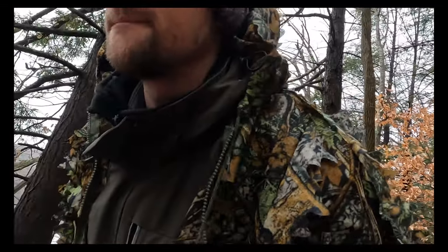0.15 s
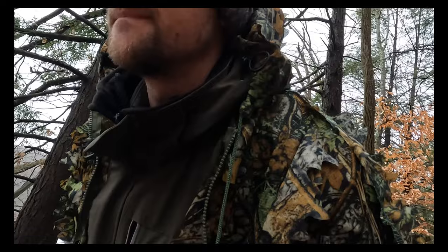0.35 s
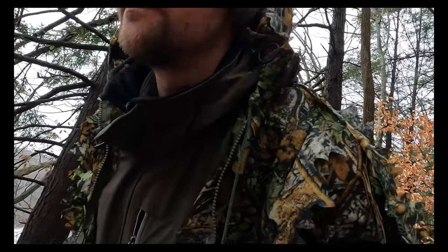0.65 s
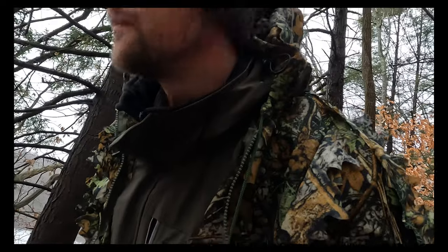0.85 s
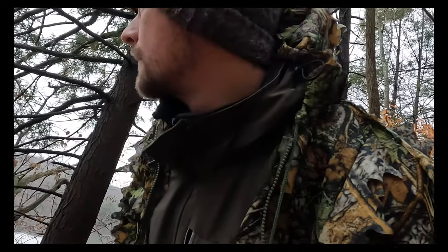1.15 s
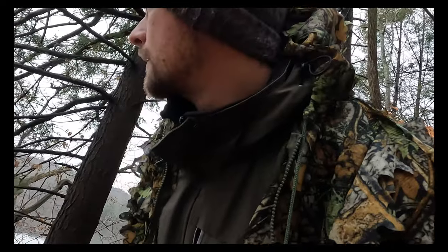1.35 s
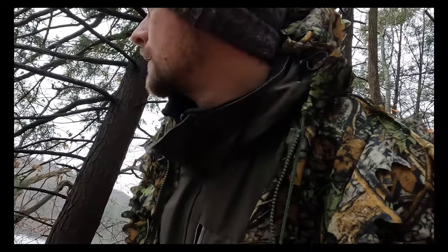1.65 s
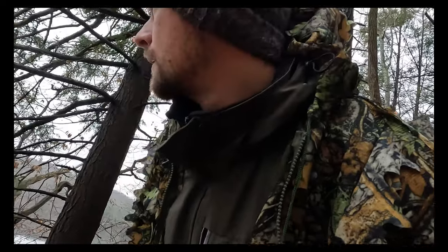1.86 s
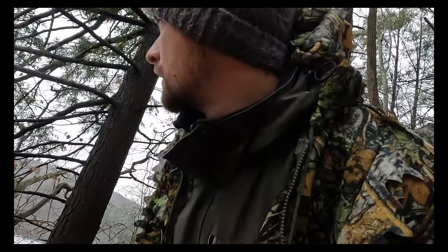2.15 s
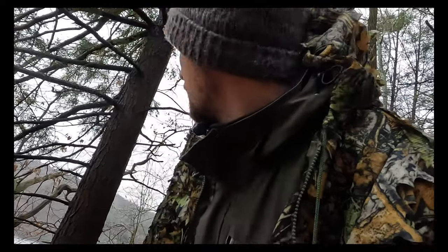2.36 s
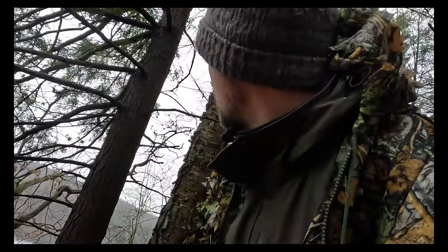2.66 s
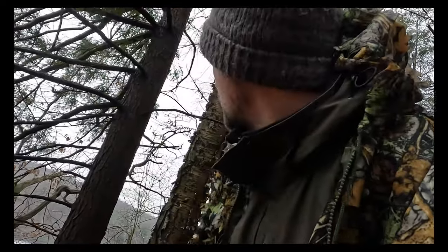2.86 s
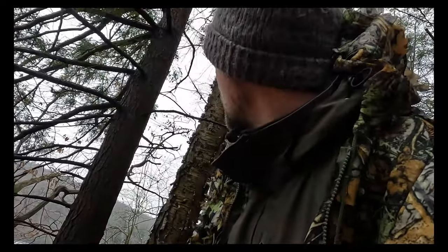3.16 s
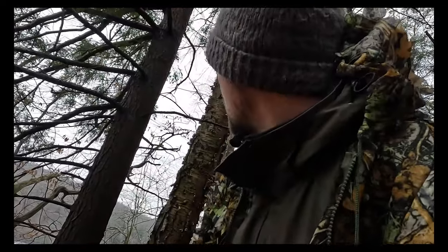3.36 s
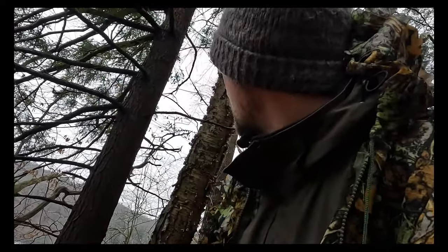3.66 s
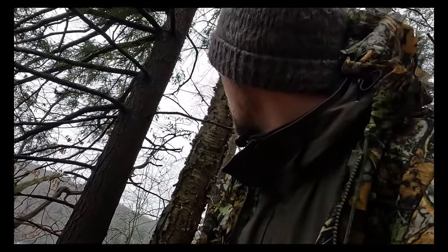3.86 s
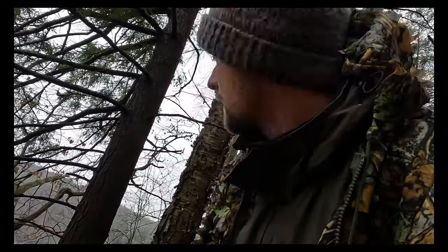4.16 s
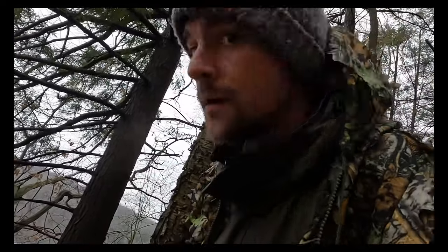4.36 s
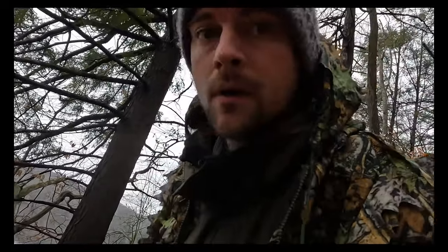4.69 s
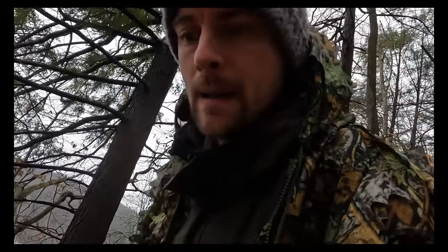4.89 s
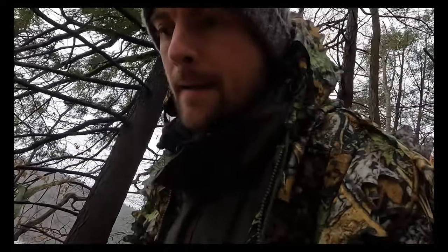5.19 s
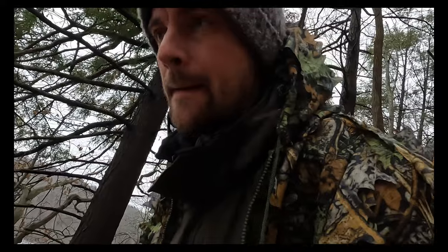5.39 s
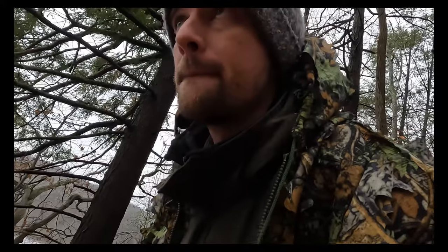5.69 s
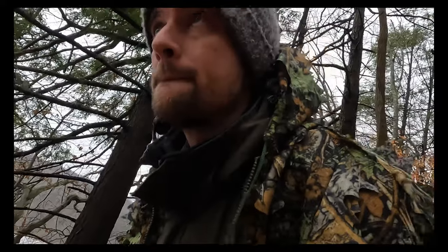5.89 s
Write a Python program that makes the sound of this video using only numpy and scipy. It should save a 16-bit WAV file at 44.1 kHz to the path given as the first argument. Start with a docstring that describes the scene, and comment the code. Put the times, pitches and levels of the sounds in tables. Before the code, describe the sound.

Close cloth noise opens the scene: soft hiss, tiny snaps and dry ticks, mostly towards the left, above a quiet deep rumble. Two faint sliding tones lead into a mid-distance bird, whose short nasal notes repeat in regular pairs until the end, echoing diffusely through the forest. The jacket settles, stirs again midway with soft rubs, and finally gives a hard snap. The microphone sits beside the clothing, in open wooded air.

```python
"""From the start a low rumble of far traffic or water lies under a jacket that rustles close by: noise and tiny snaps.
A thin hiss flickers at the very top, and soon the cloth ticks: sharp snaps that strike short ringing tones.
Then come two soft sliding tones, and a large woodland bird calls some way off, mostly in quick pairs.
Its arched, nasal notes are stacks of sine waves; random echoes off bare trunks stretch them into a long haze.
Later the cloth also gives short rubs, which are grainy puffs of noise."""
import sys
import numpy as np
from scipy import signal
from scipy.fft import rfft, irfft
from scipy.io import wavfile

SR = 44100
rng = np.random.default_rng(int(sys.argv[2]) if len(sys.argv) > 2 else 0)


def persist_wave(psi):
    """Save psi, clipped to +-1, as 16-bit WAV."""
    counts = np.round(np.clip(psi, -1, 1) * 32767).astype(np.int16)
    wavfile.write(sys.argv[1], SR, np.atleast_2d(counts).T)


N = 266055   # samples, about 6 s


def from_db(db):
    """Turn decibels into a gain."""
    return 10 ** (np.asarray(db) / 20)


def rms_one(x):
    """Scale a sound to an average (rms) level of 1."""
    return x / np.sqrt(np.mean(x ** 2) + 1e-20)


def in_time(rows):
    """Read each column of a table at every sample, in straight lines between its rows."""
    s, *columns = np.transpose(rows)
    return [np.interp(np.arange(N) / SR, s, column) for column in columns]


def at_hz(points, hz):
    """Read a spectrum table at any frequency, on a logarithmic axis."""
    table_hz, db = np.transpose(points)
    return np.interp(np.log(hz), np.log(table_hz), db)


def filtered(x, order, hz, kind="low"):
    """Filter a sound; hz is one cutoff, or the two edges of a band."""
    return signal.sosfilt(signal.butter(order, hz, kind, fs=SR, output="sos"), x)


def pan(x, db):
    """Make mono into stereo, with the left louder than the right by db."""
    return np.array([x * from_db(db / 2), x * from_db(-db / 2)])


def add(track, s, sound):
    """Mix a sound into a track, starting at s seconds."""
    i = round(s * SR)
    track[..., i:i + sound.shape[-1]] += sound[..., :N - i]


def drift(rate):
    """Slow random wandering of spread 1; a higher rate (Hz) wanders faster."""
    step = 40   # samples between computed points
    r = np.exp(-2 * np.pi * step * rate / SR)
    noise = rng.standard_normal(N // step + 2002)
    slow = signal.lfilter([1], [1, -2 * r, r * r], noise)[2000:]   # skip the filter's start
    return np.interp(np.arange(N) / step, np.arange(len(slow)), rms_one(slow))


# how alike left and right are in the rumble and rustle: f/Hz, likeness (1 = the same)
LEFT_RIGHT_LIKENESS = [(60, .992), (150, .985), (280, .6), (600, .74), (2800, .78), (6000, .55),
                       (12900, .3)]
# how far those two lean to one side: f/Hz, left minus right level/dB
LEFT_RIGHT_BALANCE = [(130, .2), (260, -2.8), (600, 0), (2800, 1), (6000, 2), (12900, 5)]


def coloured(spectrum, source):
    """Shape two noises by a spectrum, as the middle and sides of a stereo sound of rms 1."""
    hz = np.maximum(np.fft.rfftfreq(N, 1 / SR), 1)
    mid, side = rfft(source) * from_db(at_hz(spectrum, hz))
    alike = np.clip(at_hz(LEFT_RIGHT_LIKENESS, hz), -1, 1)
    lean = from_db(at_hz(LEFT_RIGHT_BALANCE, hz) / 2)
    mid = np.sqrt(1 + alike) * mid
    side = np.sqrt(1 - alike) * side
    return rms_one(irfft(np.array([(mid + side) * lean, (mid - side) / lean]), N))


# tone colour of the rumble, only relative: f/Hz, level/dB per Hz
RUMBLE_COLOUR = [(15, -27.5), (25, 1.5), (40, -1), (60, -2.5), (124, -11), (200, -21), (311, -31.5),
                 (420, -46), (600, -45), (800, -50.5), (1300, -41), (2500, -51), (7000, -72), (9000, -73),
                 (13300, -103)]


def rumble():
    """Far low noise whose deep part surges unevenly, with its middle bass slowly gaining."""
    level_db, lumps_db, growth_db_per_s = -40, 1.1, .3
    noise = coloured(RUMBLE_COLOUR, rng.standard_normal((2, N)))
    # filtered forwards and backwards, so the parts stay lined up in time
    low = signal.sosfiltfilt(signal.butter(2, 350, fs=SR, output="sos"), noise)
    middle = signal.sosfiltfilt(signal.butter(1, [60, 170], "band", fs=SR, output="sos"), low)
    grow = from_db(growth_db_per_s * (np.arange(N) - N / 2) / SR) - 1
    surges = from_db(lumps_db * drift(7.0))
    return from_db(level_db) * (noise - low + surges * (low + grow * middle))


# how much the jacket moves, as the level of its hiss and snaps: t/s, level/dB
JACKET_MOVEMENT = [(0.0, -64), (0.39, -61), (0.65, -58.5), (0.97, -61), (1.29, -65.5), (2.1, -68.5),
                   (2.28, -65.5), (2.4, -61.5), (2.46, -59.5), (2.52, -62.5), (2.85, -67.5), (3.79, -69.5),
                   (4.18, -67), (4.38, -63.5), (5.02, -65), (5.56, -64.5), (5.86, -60.5), (6.03, -62.5)]
# tone colour of hiss and snaps, only relative: f/Hz, level/dB per Hz
RUSTLE_COLOUR = [(780, -47), (1000, 2.5), (2000, -0.5), (3200, -4.5), (5000, -2.5), (7500, -7.5),
                 (8500, -14), (11000, -16.5), (13500, -33)]
# the dull part from the folds, before it follows the movement: t/s, level/dB
FOLD_LEVEL = [(0, -76.5), (1, -74.5), (2.4, -72.5), (3.5, -76.5), (4.7, -69), (5.6, -67.5), (5.75, -71.5),
              (6.03, -78.5)]


def tiny_snaps(move_db):
    """Random snaps that come faster when the cloth moves more, each with one of four tone colours."""
    usual_per_s, follow = 450, 1.5   # follow: dB of rate per dB of movement
    busy = usual_per_s * from_db(follow * move_db + 6.2 * drift(13))
    size = from_db(2.4 * np.minimum(rng.exponential(1, N), 3.5))
    snaps = (rng.random(N) < busy / SR) * size * rng.choice([-1, 1], N)
    edges, colour = np.geomspace(700, 13000, 7), rng.integers(0, 4, N)
    out = np.zeros(N)
    for k, (low, high) in enumerate(zip(edges, edges[3:])):
        mine = snaps * (colour == k) + 1e-18   # the tiny offset keeps the filter quick
        out += filtered(mine, 1, [low, high], "band") / np.sqrt((high - low) / SR)   # even out strength
    return out


def rustle():
    """Fabric slides on fabric: hiss with clumps of tiny snaps, and a duller part from the folds."""
    usual_db, folds_follow = -64.5, 1.18   # the dull part swings more than the hiss
    level_db, = in_time(JACKET_MOVEMENT)
    move_db = level_db - usual_db
    folds_db = in_time(FOLD_LEVEL)[0] + folds_follow * move_db
    snaps = tiny_snaps(move_db)
    hiss = rng.standard_normal((2, N)) * from_db(1.4 * drift(21))
    source = hiss + 1.7 * snaps * [[1], [.5]]
    folds = filtered(rng.standard_normal((2, N)), 2, [230, 700], "band")
    folds = folds + .5 * folds[::-1]   # each channel shares some of the other
    folds = rms_one(folds * from_db(2.5 * drift(20)))
    return from_db(level_db) * coloured(RUSTLE_COLOUR, source) + from_db(folds_db) * folds


# the thin top hiss, midway between the two channels: t/s, level/dB
TOP_HISS_LEVEL = [(0.0, -82.5), (0.7, -76), (1.2, -90), (2.45, -95), (2.8, -90), (3.5, -99), (4.2, -94),
                  (5.1, -92), (5.73, -80), (6.03, -86)]


def top_hiss():
    """Flickering high noise, separate in each channel, with tiny clicks that both channels share."""
    sparks_per_s, spark_db, pan_db = 44, 22, 8.5   # sparks against the unfiltered hiss; louder on the left
    sparks = (rng.random(N) < sparks_per_s / SR) * from_db(spark_db + 4 * rng.standard_normal(N))
    flicker = rng.standard_normal((2, N)) * from_db(4.3 * drift(60))
    noise = rms_one(filtered(flicker + sparks, 2, [10500, 13000], "band"))
    return from_db(in_time(TOP_HISS_LEVEL)[0] + pan_db / 2 * np.array([[1], [-1]])) * noise


# fabric ticks, peak before panning and the low cut:
# t/s, peak level/dB, brightness/dB per octave, left minus right level/dB
FABRIC_TICKS = [(0.294, -49, -3, 8), (0.304, -44.5, -1, 12), (0.324, -45, -3, 14), (0.408, -43.5, -4, 14),
                (0.4864, -41, -1, 6), (0.5839, -37, -4.5, 11), (0.612, -43, -9, 10),
                (0.6257, -33.5, -2, 7.5), (0.68, -35, 3, 8), (0.6848, -30.5, -4.5, 8.5),
                (0.734, -43, 7, -5), (0.784, -45, 1, 5), (0.81, -46, 0, 5), (0.835, -44, 2, 5),
                (1.2064, -36, -10.5, -2), (1.312, -43, -4, 8), (1.8745, -54.5, 8, 15),
                (2.291, -44, -7, -15), (2.328, -48, -7, -8), (2.343, -38.5, -4.5, -8),
                (2.383, -43, -3, -14), (2.3938, -38, -7, -9), (2.4015, -44, -5, -8), (2.4179, -45, -5, -14),
                (2.665, -50.5, -3, -5), (2.7556, -41, -17, 6), (2.791, -44, -14, 2), (2.853, -43, -8, 4),
                (2.8945, -45.5, -25, 6), (3.215, -43.5, -12, 9), (4.179, -51.5, 5, 5), (4.545, -50, 0, 0),
                (4.63, -64, 3, 4), (4.641, -62, 7, 2), (4.747, -45, -3, 8), (4.787, -57, -2, 2),
                (4.9438, -42, -15, 7), (5.138, -47, 1.5, 4), (5.551, -49, 7, 4), (5.6325, -43, 3, 4),
                (5.775, -48, -5, 2), (5.835, -38, 1, 1.1), (5.8475, -24.5, -1, 6), (5.898, -49, 1, 0)]
# short ringing tones in every tick: f/Hz, relative level/dB, time to fall 60 dB/s
TICK_TONES = [(1300, -9, .006), (2200, -7, .005), (3300, -1, .006), (4600, 0, .005), (5800, -5, .004),
              (7100, -3, .004), (9000, -12, .003), (12000, -18, .003)]


def ticks():
    """Each tick is a sharp snap that also strikes the same short tones, with strengths of its own."""
    crack_db = 18   # for a tick of neutral brightness, before the peak is set
    out, t = np.zeros((2, N)), np.arange(900) / SR
    shape = (len(FABRIC_TICKS), len(TICK_TONES))
    chance, delay = rng.standard_normal(shape), rng.random(shape)
    crack = filtered((t == 0).astype(float), 2, [1500, 6500], "band")
    for (s, db, tilt_db, pan_db), chances, delays in zip(FABRIC_TICKS, chance, delay):
        sound = crack * from_db(crack_db - abs(tilt_db))
        for (hz, level_db, t60), c, d in zip(TICK_TONES, chances, delays):
            strength = from_db(level_db + tilt_db * np.log2(hz / 4000) + 1.5 * c)
            late = np.maximum(t - d * .0004, 0)   # the tones start a little apart
            sound = sound + strength * from_db(-60 * late / t60) * np.sin(2 * np.pi * hz * late)
        add(out, s, pan(from_db(db) * sound / np.max(np.abs(sound)), pan_db))
    return filtered(out + 1e-18, 2, 800, "high")


# two soft tones before the calls, level before they are doubled and faded:
# start t/s, length t/s, first f/Hz, last f/Hz, level/dB
SLIDING_TONES = [(0.464, 0.04, 1204, 1165, -54), (0.484, 0.0347, 2250, 1436, -61)]


def sliding_tones(direct, sent):
    """Soft sine waves whose pitch slides down, heard straight and also sent into the trees."""
    for start, length, first_hz, last_hz, db in SLIDING_TONES:
        n = round(length * SR)
        phase = 2 * np.pi * np.cumsum(np.linspace(first_hz, last_hz, n)) / SR
        slide = np.sin(phase) * np.hanning(n) ** 0.63
        add(direct, start, 2 * from_db(db) * slide)
        add(sent[0], start, from_db(db - 10) * slide)


# one note, dying away on its low pitch after the arch:
# share of the arch length, pitch against the top, swell level/dB
NOTE_ARCH = [(0, .775, -1), (.2, .785, 0), (.27, .86, -1), (.33, .96, 0), (.39, .992, 0), (.5, 1, 0),
             (.66, .98, 0), (.78, .93, 0), (.9, .862, 0), (1, .805, 0), (1.13, .765, -4)]
# resonances of throat and bill that the upper partials slide through: f/Hz, level/dB
BILL_RESONANCES = [(2300, -2), (2700, 2), (2950, -4), (3250, 0), (3750, -4), (4080, 0), (4300, -8),
                   (4600, -10), (5050, 0), (7500, -3)]


def note(length, top_hz, shape_db, first_db, fourth_db, fifth_db, uneven_db):
    """One arched note: sine waves at multiples of one pitch (partials), each wavering on its own."""
    edge_s, throat_hz = .0035, 975   # the throat radiates little below throat_hz
    rasp_db, rasp_step_s, low_rasp_share = 4, .003, .4   # the two lowest partials break up less
    share, pitch, swell_db = np.transpose(NOTE_ARCH)
    t = np.arange(round(length * share[-1] * SR)) / SR
    hz = top_hz * np.interp(t / length, share, pitch)
    phase = 2 * np.pi * np.cumsum(hz) / SR
    edges = np.clip(np.minimum(t, t[-1] - t) / edge_s, 0, 1)
    second_db = np.interp(t / length, [.18, .5, .82], shape_db)
    partials_db = [first_db, second_db, fourth_db - 5, fourth_db, fifth_db, fourth_db - 16, fourth_db - 16]
    waver = rng.standard_normal((len(partials_db), 8))
    out = 0
    for k, (db, w) in enumerate(zip(partials_db, waver), start=1):
        wobble_db = uneven_db * np.interp(t / length, np.linspace(0, 1, 8), w)
        steps = np.arange(0, .1, rasp_step_s)
        rasp = from_db(rasp_db * np.interp(t, steps, rng.standard_normal(len(steps))))
        throat = 1 / np.sqrt(1 + (throat_hz / (k * hz)) ** 16)
        if k > 2:
            colour = from_db(at_hz(BILL_RESONANCES, k * hz)) * rasp
        else:
            colour = rasp ** low_rasp_share
        out = out + from_db(db + wobble_db) * throat * colour * np.sin(k * phase)
    return np.sqrt(2) * edges * from_db(np.interp(t / length, share, swell_db)) * out


def branches(sung, length_s, count):
    """Close reflections off branches and ground roughen a note and drag out its treble."""
    twig_hz, twig_db, branch_db = 3000, -11, -13   # twigs return only the treble, and more of it
    at, sign = rng.random((2, count))
    taps = np.zeros(round(length_s * SR) + 1)
    places = 1 + (at * (len(taps) - 2)).astype(int)
    taps[places] = from_db(-4 * at) * np.sign(sign - .5)   # later ones are weaker
    treble = filtered(sung, 4, twig_hz, "high")
    returned = from_db(branch_db) * (sung - treble) + from_db(twig_db) * treble
    out = signal.fftconvolve(returned, taps)
    add(out, 0, sung)
    return out


# bird notes, levels before throat, bill, rasp, swell and echoes: start t/s, arch length t/s, top f/Hz,
# 2nd partial at start, top and fall level/dB (3 columns), 1st, 4th and 5th partial level/dB (3 columns)
BIRD_NOTES = [(0.659, 0.055, 1056, -71, -58, -49.5, -60.5, -72, -81),
              (0.773, 0.042, 1002, -56.5, -48, -47.5, -54, -68, -61),
              (0.903, 0.05, 1068, -53.5, -48.5, -47.5, -61, -72, -73),
              (1.091, 0.057, 1042, -52.5, -50, -48.5, -66, -66, -66),
              (1.192, 0.057, 1033, -50, -48, -48.5, -64, -64.5, -66),
              (1.402, 0.056, 1029, -52.5, -50, -51.5, -76, -78, -71),
              (1.52, 0.052, 1029, -51, -46.5, -50.5, -64, -70.5, -69),
              (1.731, 0.054, 1028, -52, -59, -52.5, -68, -77, -65.5),
              (1.848, 0.048, 1043, -51.5, -54, -50.5, -68, -75, -69),
              (2.053, 0.058, 1035, -54.5, -65, -56, -69, -73, -69),
              (2.168, 0.054, 1038, -77, -63, -55, -66, -72, -71),
              (2.367, 0.055, 1056, -62, -58, -55, -64, -65, -68),
              (2.482, 0.044, 1050, -70, -70, -56, -60.5, -64.5, -68),
              (2.685, 0.052, 1023, -59, -58, -62, -67, -71, -63),
              (2.802, 0.045, 1049, -62, -55, -53, -63.5, -69, -69),
              (2.998, 0.054, 1006, -60, -51.5, -54, -68, -70, -74),
              (3.126, 0.046, 1024, -65, -47, -50, -69, -65, -81),
              (3.323, 0.05, 1014, -51.5, -51.5, -51.5, -67, -68.5, -77),
              (3.46, 0.05, 1015, -57, -44.5, -47, -66, -70, -66.5),
              (3.677, 0.053, 1004, -62, -51.5, -54, -61, -78, -75),
              (3.803, 0.051, 1016, -71, -53, -50.5, -64, -75, -72),
              (4.017, 0.054, 1016, -58, -46, -55.5, -68, -78, -73),
              (4.136, 0.052, 1024, -58, -53.5, -53.5, -69, -83, -78),
              (4.348, 0.044, 1018, -61, -57, -58, -65, -81, -80.0),
              (4.473, 0.051, 1023, -59, -56.0, -51, -65, -76, -74),
              (4.681, 0.056, 990.5, -51.5, -72, -58, -57.5, -77, -76),
              (4.822, 0.05, 1030.0, -56, -59, -55, -59, -73, -88),
              (5.033, 0.061, 1008, -60, -56, -54, -59.5, -85, -76),
              (5.161, 0.044, 1017, -72, -55, -51.5, -61, -70, -94),
              (5.374, 0.058, 1013, -54.5, -69.0, -53, -58.5, -75, -82.0),
              (5.497, 0.045, 1007, -70.0, -70, -54.5, -55, -87, -83),
              (5.708, 0.064, 1007, -60, -67, -58, -57.5, -73, -89),
              (5.829, 0.052, 1026, -66, -59, -60, -66, -82.0, -96)]
# notes as sent into the trees, on the same footing: t/s, 1st, 2nd and 4th partial level/dB (3 columns)
SENT_LEVELS = [(0.6, -60, -52.5, -56), (1.3, -62.5, -53.5, -63.5), (2, -64.5, -52, -62),
               (3.002, -64, -52.5, -62), (4, -65, -54.5, -66), (4.5, -62, -53, -64.5),
               (4.85, -60.5, -53, -67), (5.3, -63, -55, -66), (6, -74, -58.5, -70)]
# added to the sent 2nd partial at start, top and fall of a note: level/dB (3 values)
SENT_SHAPE = [-5, 2, 1.5]


def calls(direct, sent):
    """The bird's notes as they arrive straight, and as they go into the trees from changing perches."""
    sent_fifth_db = 3.5   # 5th partial against the 4th
    s, first, second, fourth = np.transpose(SENT_LEVELS)
    for i, (start, length, top_hz, *shape_db, first_db, fourth_db, fifth_db) in enumerate(BIRD_NOTES):
        sung = note(length, top_hz, shape_db, first_db, fourth_db, fifth_db, uneven_db=1.6)
        add(direct, start, branches(sung, .025, count=7))
        sent_shape_db = np.interp(start, s, second) + np.array(SENT_SHAPE)
        low_db, high_db = np.interp(start, s, first), np.interp(start, s, fourth)
        to_trees = note(length, top_hz, sent_shape_db, low_db, high_db, high_db + sent_fifth_db, uneven_db=3.5)
        add(sent[i % len(sent)], start, to_trees)


def forest(sent):
    """Echoes off scattered trunks: a quick near cluster and a long far haze, partly shared by both ears."""
    near_t60_s, far_t60_s, far_db, trunks_per_s = 0.083, 0.85, -15.5, 700   # t60: time to fall 60 dB
    haze_cut_hz = 2150   # twigs and air dull the far haze
    t, out = np.arange(round(1.3 * SR)) / SR, 0
    near = from_db(-60 * t / near_t60_s)
    far = from_db(far_db - 60 * t / far_t60_s)
    for x in sent:
        echoes = (rng.random((3, len(t))) < trunks_per_s / SR) * rng.standard_normal((3, len(t)))
        ears = (0.73 * echoes[0] + echoes[1:]) * np.clip(t / 0.047, 0, 1)   # the echoes build up first
        ears = ears * near + filtered(ears * far, 2, haze_cut_hz)
        # give every echo pattern the same strength below the haze cutoff
        power = filtered(ears, 2, haze_cut_hz) ** 2 * SR / 2 / haze_cut_hz
        ears = ears / np.sqrt(np.sum(power, axis=1, keepdims=True))
        out = out + signal.fftconvolve(x[None], ears, axes=1)[:, :N]
    return out


# side on which the straight call is louder: t/s, left minus right level/dB
CALL_SIDE = [(0, 2), (2.2, 0.5), (4.3, 0.5), (4.8, -4), (5.3, -2), (6, -1)]


def bird_among_trees():
    """The straight call plus its forest echoes; both reach the left channel slightly later."""
    perches, left_lag = 9, 2   # left_lag in samples
    # the bird keeps moving, so the echo pattern changes from note to note
    direct, sent = np.zeros(N), np.zeros((perches, N))
    sliding_tones(direct, sent)
    calls(direct, sent)
    call = pan(direct, *in_time(CALL_SIDE)) + forest(sent)
    call[0] = np.roll(call[0], left_lag)
    return call


# short rubs of the fabric, level before the swell and let-go:
# end t/s, length t/s, centre f/Hz, width f/Hz, level/dB
FABRIC_RUBS = [(2.433, 0.09, 4450, 7000, -71), (2.44, 0.11, 794, 900, -58.5),
               (2.546, 0.13, 910, 900, -65.5), (4.363, 0.15, 8700, 7000, -73.5),
               (4.784, 0.14, 1430, 1830, -58.5), (5.607, 0.18, 460, 460, -62),
               (5.806, 0.014, 4000, 5100, -56), (5.836, 0.022, 5000, 1300, -45),
               (5.91, 0.029, 5140, 1960, -66)]


def rubs():
    """Grainy puffs of noise in a broad resonance swell as the cloth drags and stop when it lets go."""
    out = np.zeros((2, N))
    for end, length, hz, width_hz, db in FABRIC_RUBS:
        n = round(length * SR)
        grain_gain = from_db(1.2 * np.repeat(rng.standard_normal(100), 80))   # a new gain every 80 samples
        grains = rng.standard_normal((2, 8000)) * grain_gain
        noise = filtered(grains, 2, [hz - width_hz / 2, hz + width_hz / 2], "band")[:, -n:]
        drag = np.interp(np.arange(n) / n, [0, .7, .92, 1], [0, 1, 1, 0])
        add(out, end - length, from_db(db) * drag * rms_one(noise + .5 * noise[::-1]))
    return out


def scene():
    """Rumble, jacket, top hiss and the bird among trees, all added together."""
    return rumble() + rustle() + top_hiss() + ticks() + bird_among_trees() + rubs()


def record(dry):
    """Cut off the very top with a steep low-pass filter."""
    cutoff_hz = 13500 * 1.07   # where the filter reaches its full 50 dB cut
    return signal.sosfilt(signal.cheby2(10, 50, cutoff_hz, fs=SR, output="sos"), dry)


dry = scene()
out = record(dry)
persist_wave(out)
```